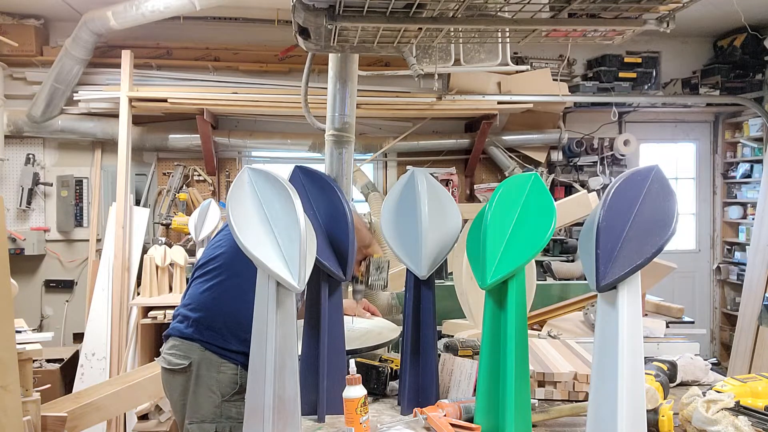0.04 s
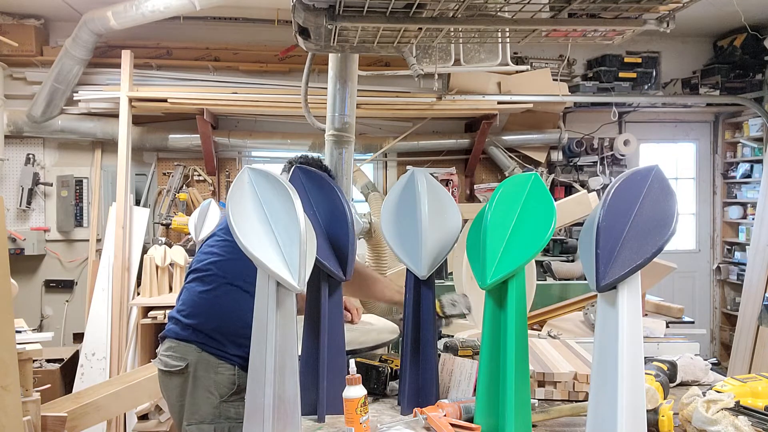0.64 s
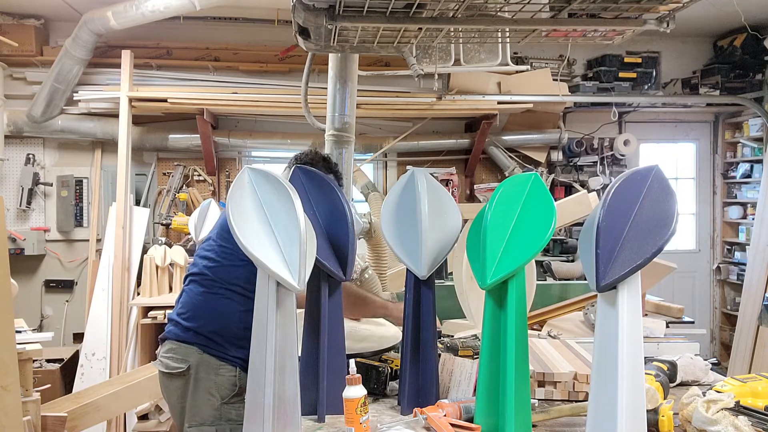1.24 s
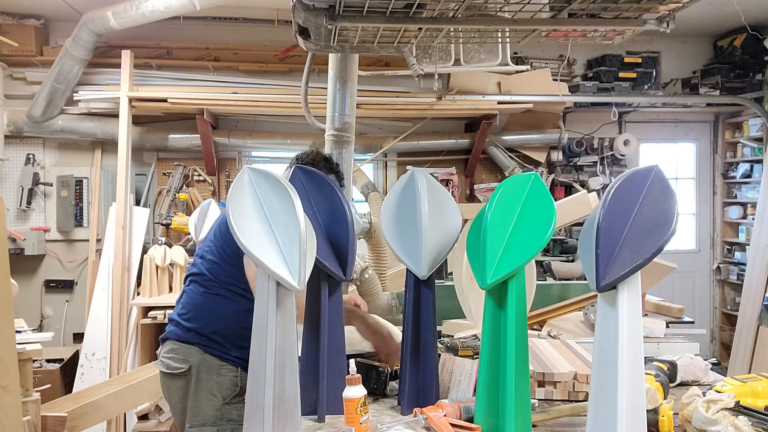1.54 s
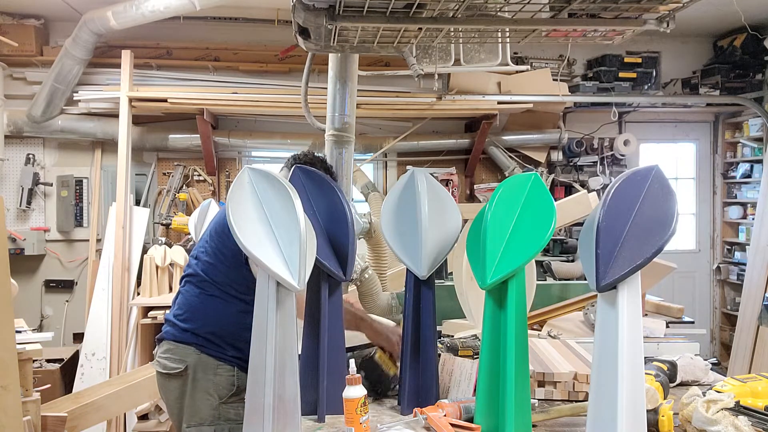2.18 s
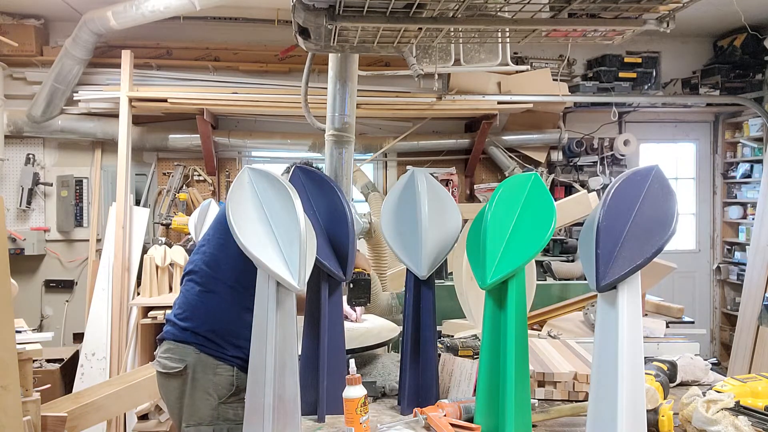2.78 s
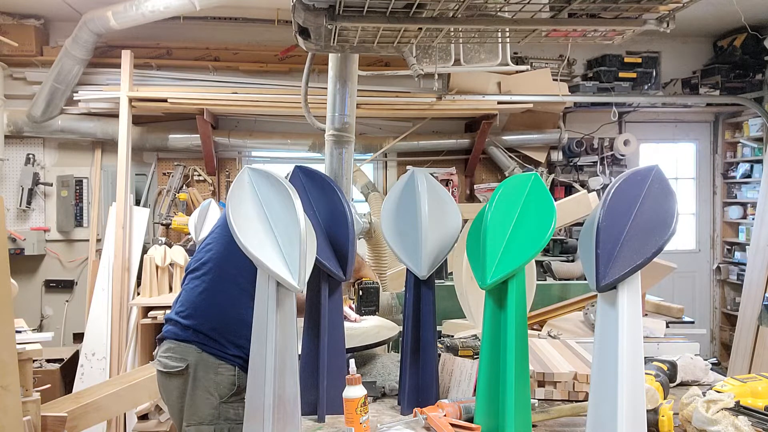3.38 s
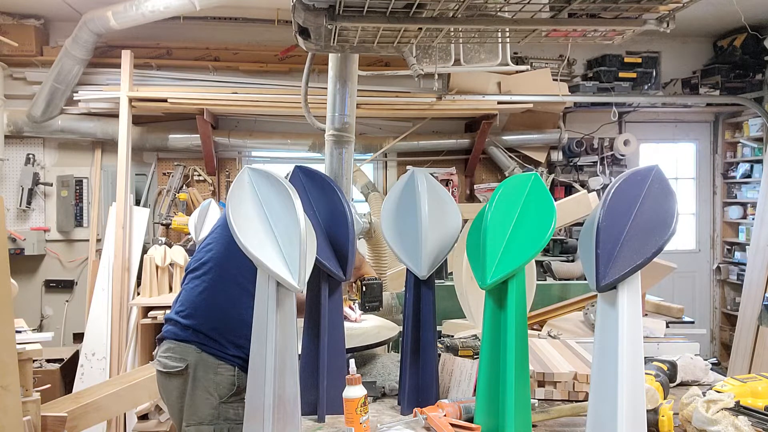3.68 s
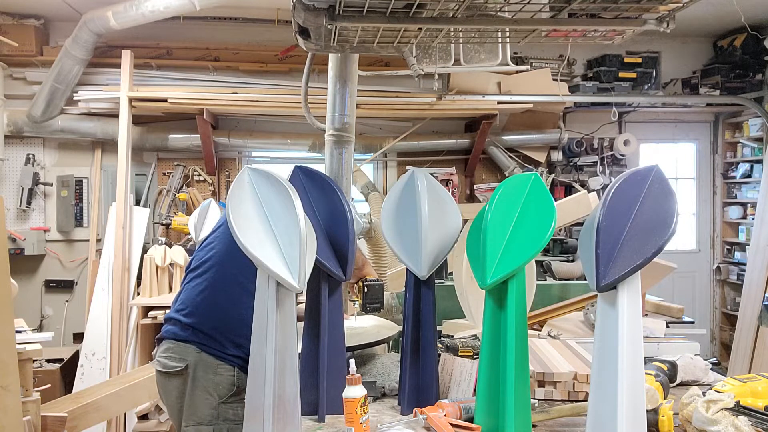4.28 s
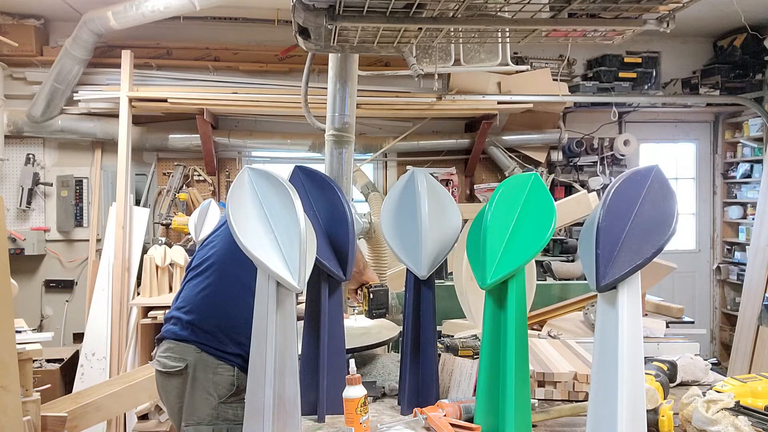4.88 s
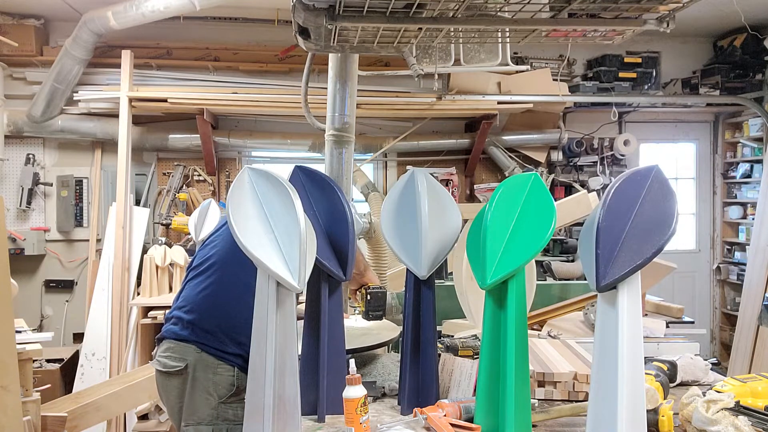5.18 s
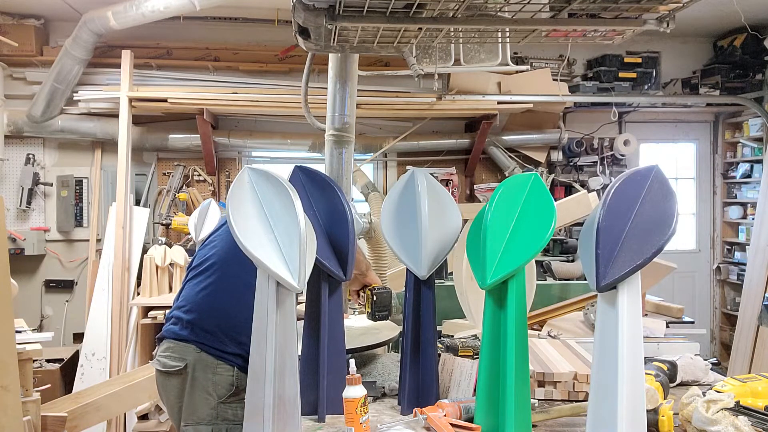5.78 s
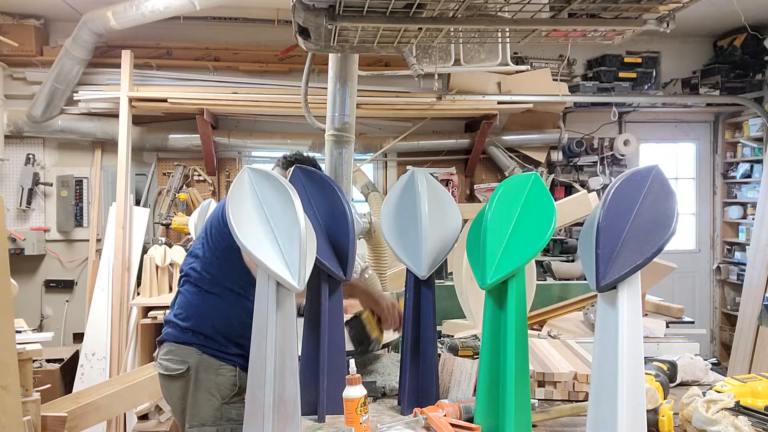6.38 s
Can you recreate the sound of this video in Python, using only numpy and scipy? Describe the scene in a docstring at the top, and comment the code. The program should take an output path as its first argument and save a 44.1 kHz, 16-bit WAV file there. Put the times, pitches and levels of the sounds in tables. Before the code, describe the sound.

Scattered wooden knocks, small clicks and faint rustles come from a workbench a few metres off, over the low hum of a fan motor. Halfway through, a screw starts biting into a board in stop-start rasps with high squeals. It ends with the loudest part, a quick rattle of knocks as the drill bit slips in the screw head. The cluttered workshop adds a short stereo echo.

```python
"""Driving a screw in a small workshop

A few metres from a stereo microphone, a woodworker puts down a cordless drill, picks up a screw and
drives it into a board in short bursts. The thread grinds as it tears fibres and squeals as it sticks
and slips; as it pulls tight the bit jumps and hammers board and bench. The cluttered shop gives a
short echo, and a motor hums on behind it all."""
import sys
import numpy as np
from scipy import signal
from scipy.fft import rfft, irfft
from scipy.io import wavfile

SR = 44100
rng = np.random.default_rng(int(sys.argv[2]) if len(sys.argv) > 2 else 0)


def store_pcm(level_fs):
    """Save levels as 16-bit WAV."""
    pcm = np.round(np.clip(level_fs, -1, 1) * 32767).astype(np.int16)
    wavfile.write(sys.argv[1], SR, np.atleast_2d(pcm).T)


N = 292631
TIME = np.arange(N) / SR
TOP_HZ = 15900


def undb(db):
    """Decibels to gain."""
    return 10 ** (np.asarray(db) / 20)


def unit_energy(x):
    """Scale to an energy of 1."""
    return x / np.sqrt(np.sum(x ** 2))


def unit_rms(x):
    """Scale to an rms of 1."""
    return x / np.std(x)


def through(x, response):
    """Pass a sound through an impulse response."""
    return signal.fftconvolve(x, response)[:len(x)]


def colour(points, size=2048):
    """Causal impulse response with a (Hz, dB) spectrum."""
    hz, db = np.transpose(points)
    bin_hz = np.fft.rfftfreq(size, 1 / SR)
    gains = undb(np.interp(np.log(bin_hz + 1), np.log(hz), db))
    cepstrum = irfft(np.log(gains))
    cepstrum[1:size // 2] *= 2
    cepstrum[size // 2 + 1:] = 0
    return irfft(np.exp(rfft(cepstrum)))


def ring(modes):
    """Impulse response of a struck body: damped sines of alternating sign."""
    t = TIME[:SR // 3]
    return unit_energy(sum((-1) ** k * undb(db - 60 * t / t60) * np.sin(2 * np.pi * hz * t)
                           for k, (hz, db, t60) in enumerate(modes)))


def wander(rate):
    """A random curve with a spread of 1 and about rate turns a second."""
    steps = rng.standard_normal(N // 8)
    return unit_rms(np.interp(TIME * rate, np.arange(len(steps)), steps))


# Width of the room at the microphone. Each row: frequency in Hz, side against mid in dB.
SIDE_SPECTRUM = [(60, -12), (250, -13), (600, -5), (1200, -1.5), (2500, -0.5), (12000, 2)]

def stereo(mid, side):
    """Left and right at the microphone agree in the bass and part in the treble."""
    side = through(side, colour(SIDE_SPECTRUM))
    return np.array([mid + side, mid - side])


# Room tone, the rush of a fan. Each row: frequency in Hz, relative level in dB.
FAN_SPECTRUM = [(12, -25), (20, -11.5), (60, -8.5), (167, -15.5), (366, -17.5), (433, -20.5), (589, -18.5),
                (922, -26), (1000, -21), (1520, -37), (2390, -36), (2740, -40), (5370, -44), (8390, -61),
                (16000, -65.5)]
# Hum of motor and fan, in the centre of the image. Each row: frequency in Hz, level in dB.
HUM_LINES = [(29, -68.5), (58, -54.5), (118.4, -64), (172, -76), (307, -70), (361, -69.5), (597, -68),
             (861, -77), (980, -73)]

def background_motor(fan_db=-57, waver_db=1, drift=0.0091):
    """A running motor hums, wavering in pitch and level, over the rush of its fan."""
    shape = unit_energy(colour(FAN_SPECTRUM, size=8192))
    rush = stereo(*(through(noise, shape) for noise in rng.standard_normal((2, N))))
    hum = np.zeros(N)
    for hz, db in HUM_LINES:
        gain = undb(db + waver_db * wander(5.5))
        phase = 2 * np.pi * np.cumsum(hz * (1 + drift * wander(3.7))) / SR
        hum += gain * np.sin(phase)
    return undb(fan_db + .5 * wander(16)) * rush + np.sqrt(2) * hum


def shop_echo(x, low_t60_s=0.24, high_t60_s=0.23, low_db=-3, high_db=1, split_hz=1300, build_s=0.001):
    """Direct sound plus a dense, short echo from shelves and timber, stronger in the treble."""
    t = TIME[:SR // 2]
    split = signal.butter(3, split_hz, fs=SR, output="sos")
    build = 1 - np.exp(-t / build_s)
    low_decay = unit_energy(undb(-60 * t / low_t60_s) * build)
    high_decay = unit_energy(undb(-60 * t / high_t60_s) * build)
    tails = []
    for noise in rng.standard_normal((2, len(t))):
        low = signal.sosfiltfilt(split, noise)
        tails.append(undb(low_db) * low * low_decay + undb(high_db) * (noise - low) * high_decay)
    return np.array([0.62 * x + 0.61 * through(x, tail) for tail in stereo(*tails)])


# Hands at the bench, faint from here. Each row: peak time and half length in seconds, level in dB,
# frequency in Hz near the top of the band.
HAND_SLIDES = [(1.064, 0.015, -63, 3160), (1.13, 0.04, -63.5, 5360), (1.917, 0.018, -63, 3170),
               (1.984, 0.0047, -57, 4770), (2.123, 0.026, -63, 5760), (2.237, 0.02, -51.5, 5940),
               (2.335, 0.011, -48, 4850), (6.553, 0.043, -81, 5000)]

def hand_rustles():
    """Short swells of fine friction as hands and parts slide."""
    out = np.zeros(N)
    for peak_s, half_s, db, hz in HAND_SLIDES:
        band = signal.butter(2, [hz / 1.9, hz * 1.09], "band", fs=SR, output="sos")
        friction = unit_rms(signal.sosfilt(band, rng.laplace(size=N)))
        out += undb(db) * friction * np.exp(-((TIME - peak_s) / half_s) ** 2)
    return out


# Crack of hard contacts and tearing fibres. Each row: frequency in Hz, relative level in dB.
CRACK_SPECTRUM = [(100, -13), (500, -8.5), (1100, 6.5), (1700, -2), (2600, 1), (3600, 5.5), (4500, -1),
                  (5600, 0), (7000, -3.5), (8300, -16), (11000, -19), (13000, -15.5), (16000, -16)]
# Bit and screw. Each row: frequency in Hz, relative level in dB, seconds to fade by 60 dB.
STEEL_MODES = [(2560, -7, .04), (3260, -3, .06), (3375, -2, .07), (3540, 0, .10), (3700, -5, .05),
               (3910, -4, .05), (4960, -7, .025), (5340, -8, .03), (5710, -9, .03), (6760, -8, .025)]

def steel_crack(force, ring_db):
    """A dry crack together with the ring of bit and screw."""
    crack = through(force, unit_energy(colour(CRACK_SPECTRUM)))
    return crack + undb(ring_db) * through(force, ring(STEEL_MODES))


# The board on the bench. Each row: frequency in Hz, relative level in dB, seconds to fade by 60 dB.
BOARD_MODES = [(555.5, -4, 0.17), (669, -3, 0.013), (788.6, 5, 0.094), (816.6, 3.5, 0.016),
               (990.5, 4.5, 0.032), (1185, -3, 0.032), (1264.6, -4, 0.034), (1289, -1, 0.097),
               (1367, 3, 0.013), (1512, -3, 0.02), (1814, -6.5, 0.076), (1865, -13.5, 0.18),
               (2350, -12.5, 0.025)]

def board_ring(force):
    """A force sets the board ringing."""
    return through(force, ring(BOARD_MODES))


def trigger_gain(start_s, length_s, swell_db, attack_s=0.019, brake_db_per_s=364):
    """Gain of one burst: the drill spins up, the load grows or eases, the brake stops it."""
    t = TIME - start_s
    load_db = swell_db * (np.clip(t / length_s, 0, 1) - .5)
    brake_db = brake_db_per_s * np.clip(t - length_s, 0, 1)
    return np.clip(t / attack_s, 0, 1) ** 2 * undb(load_db - brake_db)


# The thread cutting, a few metres off. Each row: start and length in seconds, then level,
# swell over the burst and treble lift, all in dB.
CUTTING_BURSTS = [(-0.03, .19, -45.5, -3, 5), (0.162, 0.025, -41.5, 7, 2), (3.654, 0.047, -31, 2.5, 4),
                  (3.779, 0.068, -41, 9, -6), (3.915, 0.027, -44, 1.5, -9), (4.36, 0.058, -47.5, 3, -4.5),
                  (4.502, 0.078, -39.5, 0, -0.5), (4.635, 0.27, -33, -5.5, -0.5),
                  (4.849, 0.13, -37, 7.5, -10.5), (5.242, 0.16, -23, 8.5, -2), (5.654, 0.079, -21, 12, 5.5),
                  (5.791, 0.067, -41, -1, -16)]

def thread_grinding(grain_db=3, judder_db=3, board_db=-11, treble_hz=7000):
    """The thread tears wood fibres: dense snaps of unequal size, coming in fits, that stir the board."""
    snaps = rng.standard_normal(N) * (rng.random(N) < .15)
    snaps *= undb(grain_db * rng.standard_normal(N))
    judder = undb(judder_db * wander(150))
    tearing = unit_rms(steel_crack(snaps, ring_db=-10.5) + undb(board_db) * board_ring(snaps))
    dull = signal.sosfiltfilt(signal.butter(4, treble_hz, fs=SR, output="sos"), tearing)
    treble = tearing - dull
    out = np.zeros(N)
    for start_s, length_s, db, swell_db, lift_db in CUTTING_BURSTS:
        out += undb(db) * trigger_gain(start_s, length_s, swell_db) * (dull + undb(lift_db) * treble)
    return judder * out


# Timbre of a squeal. Each entry: relative level in dB of one harmonic, from the second up.
OVERTONE_DB = [-0.5, -2, 0.5, -9, -26, -29]
# The screw squealing in the board. Each row: start and length in seconds, pitch in Hz,
# glide as a share of the pitch, level in dB, gain of the overtones in dB.
SCREW_SQUEALS = [(0.01, 0.1, 1012, 0.015, -48, -28), (0.088, 0.03, 1195, -0.11, -41.5, -24),
                 (0.914, 0.055, 787, 0.013, -47.5, -25), (1.91, 0.04, 770, 0, -46, -28),
                 (3.705, 0.034, 791, -0.019, -21.5, -40.5), (3.825, 0.041, 776, -0.0023, -28, -22),
                 (3.927, 0.045, 998, -0.038, -42, -37), (4.39, 0.053, 1261, 0.043, -45.5, -13),
                 (4.54, 0.041, 1040, -0.011, -31.5, -15.5), (4.684, .215, 1369, -.01, -24.5, -5),
                 (4.871, 0.024, 2384, -0.094, -25.5, -32), (4.916, 0.036, 3350, -0.034, -27.5, -34.5),
                 (4.918, 0.061, 1291, 0.0029, -21.5, -7), (5.259, 0.046, 1332, -0.09, -28.5, -3),
                 (5.3, 0.091, 1778, 0, -28.5, -3.5), (5.295, .05, 3600, .11, -18, -36),
                 (5.344, 0.044, 3580, 0.00026, -17.5, -24.5)]

def screw_squeals(jitter=.02, flutter_db=2.5, arch_per_s2=4.3, fade_share=0.4):
    """The screw sticks and slips in its hole: harmonics of unsteady pitch, each fluttering in level."""
    out = np.zeros(N)
    waver = 1 + jitter * wander(700) + .012 * wander(200)
    flutter = [undb(flutter_db * np.tanh(wander(130))) for _ in range(len(OVERTONE_DB) + 1)]
    for start_s, length_s, pitch_hz, glide, db, overtones_db in SCREW_SQUEALS:
        span = slice(int(start_s * SR), int((start_s + length_s) * SR))
        t = TIME[span] - start_s - length_s / 2  # zero in mid-squeal
        hz = pitch_hz * (1 + glide * t / length_s - arch_per_s2 * t ** 2)
        phase = 2 * np.pi * np.cumsum(hz * waver[span]) / SR
        fundamental = flutter[0][span] * np.sin(phase)
        overtones = sum(undb(harmonic_db) * flutter[k - 1][span] * np.sin(k * phase)
                        for k, harmonic_db in enumerate(OVERTONE_DB, 2))
        fade = signal.windows.tukey(len(t), fade_share)
        out[span] += undb(db) * (fundamental + undb(overtones_db) * overtones) * fade
    return out


# The workbench. Each row: frequency in Hz, relative level in dB, seconds to fade by 60 dB.
BENCH_MODES = [(120, -23, 0.25), (180.8, -16, 0.039), (267, -11.5, 0.048), (344, -5, 0.048),
               (369.6, -1, 0.07), (386.7, -2.5, 0.089), (433.5, -4, 0.061), (513.6, -10.5, 0.12),
               (572, -11.5, 0.21), (650, -4.5, 0.041)]
# A small part. Each row: multiple of its pitch, relative level in dB, seconds to fade by 60 dB.
PART_MODES = [(.9, -3, .022), (0.999, 2.5, 0.072), (1.11, -7.5, 0.02)]

def blow(start_s, bench_db, board_db, click_db, click_hz, rattle_s, ping_hz, ping_db):
    """A push and a short rattle ring bench and board, click in the steel and ping the part struck."""
    t = TIME[:SR // 3]
    push = signal.unit_impulse(len(t))
    decay = np.exp(-t / rattle_s)
    rattle = unit_energy(rng.laplace(size=len(t)) * decay * (1 - decay))
    force = push + undb(-3) * rattle
    thud = through(force, ring(BENCH_MODES))
    click = lowpass_click(0.083 * push + rattle, click_hz)
    ping = through(force, ring([(ratio * ping_hz, db, t60) for ratio, db, t60 in PART_MODES]))
    layers = [(bench_db, thud), (board_db, board_ring(force)), (click_db, click), (ping_db, ping)]
    hit = sum(undb(db) * unit_energy(layer) for db, layer in layers)
    hit *= np.sqrt(SR / 80)  # levels count as rms over 1/80 s
    placed = np.pad(hit, (int(start_s * SR), N))[:N]
    low_cut = signal.butter(3, 100, "high", fs=SR, output="sos")  # the blows carry little deep bass
    return signal.sosfilt(low_cut, placed)


def lowpass_click(force, hz):
    """A steel contact, dulled above hz."""
    return signal.sosfilt(signal.butter(2, hz, fs=SR, output="sos"), steel_crack(force, ring_db=-17.5))


# Handling at the bench. Each row: start in seconds, bench thud, board ring and steel click in dB,
# click low-pass in Hz, rattle decay in seconds, ping pitch in Hz, ping level in dB.
HANDLING_KNOCKS = [(0.125, -69, -43, -32.5, 3080, 0.0036, 2414, -35.5),
                   (0.710, -31, -22.5, -43, 8800, 0.0063, 12100, -61),
                   (0.714, -32, -40, -38.5, 2900, 0.0083, 360, -23),
                   (0.719, -58, -31, -45, 2500, 0.0044, 756, -21.5),
                   (1.154, -35.5, -37, -38.5, 10000, 0.01, 2308, -38),
                   (2.132, -19.5, -36, -44.5, 2800, 0.0019, 380, -20),
                   (2.319, -61, -70, -43.5, 5500, 0.0047, 3210, -42),
                   (3.249, -53, -40.5, -52, 3980, 0.012, 796.5, -31.5),
                   (3.462, -46.5, -43.5, -49.5, 5030, 0.0064, 773, -35.5),
                   (3.979, -43.5, -51.5, -73, 4000, 0.002, 993, -59),
                   (4.287, -48, -57.5, -74, 4030, .0014, 802, -58)]

def handling_knocks():
    """Drill, screw and board are moved about, each knock with its own ring."""
    return sum(blow(*knock) for knock in HANDLING_KNOCKS)


# The bit jumping, loudest at the microphone. Each row: start in seconds, bench thud in dB, click in dB.
BIT_JUMPS = [(3.682, -26, -21), (3.706, -28.5, -20.5), (5.348, -24.5, -21), (5.359, -7, -14.5),
             (5.396, -16, -29.5), (5.676, -39.5, -26.5), (5.702, -11, -17.5), (5.727, -11.5, -22.5),
             (5.752, -12, -18.5), (5.782, -16.5, -40.5), (5.797, -18, -23.5)]

def bit_jumps():
    """The bit jumps out of the screw head and slams back, hammering the wood and pinging the chuck."""
    return sum(blow(start_s, bench_db=db, board_db=db - 4.5, click_db=click_db, click_hz=10800,
                    rattle_s=0.0049, ping_hz=1207, ping_db=db - 10.5)
               for start_s, db, click_db in BIT_JUMPS)


def scene():
    """All the work happens at one spot on the bench, heard across the shop."""
    work = handling_knocks() + bit_jumps() + thread_grinding() + screw_squeals() + hand_rustles()
    return shop_echo(work) + background_motor()


def record(dry):
    """The recorder clips at full scale and cuts the top of the treble."""
    high_cut = signal.ellip(10, .2, 80, TOP_HZ, fs=SR, output="sos")
    return signal.sosfilt(high_cut, np.clip(dry, -1, 1))


dry = scene()
out = record(dry)
store_pcm(out)
```